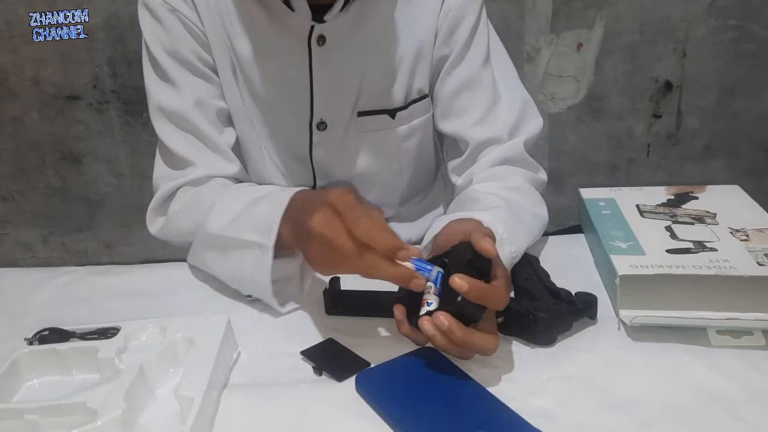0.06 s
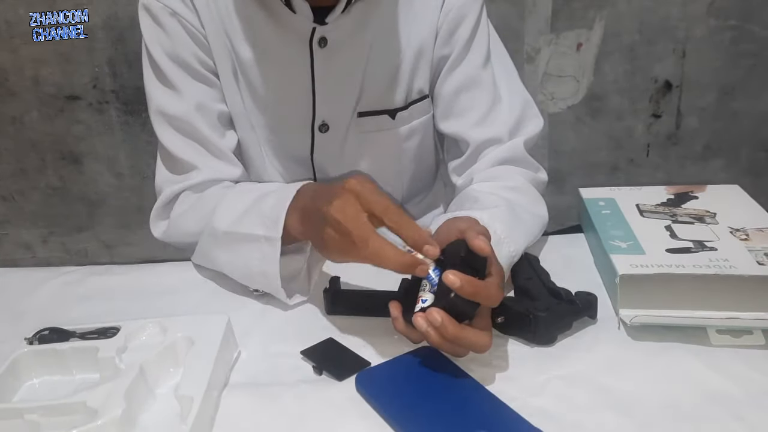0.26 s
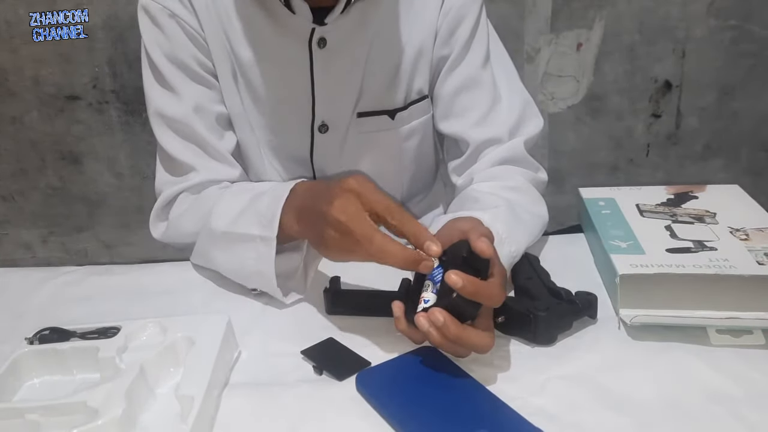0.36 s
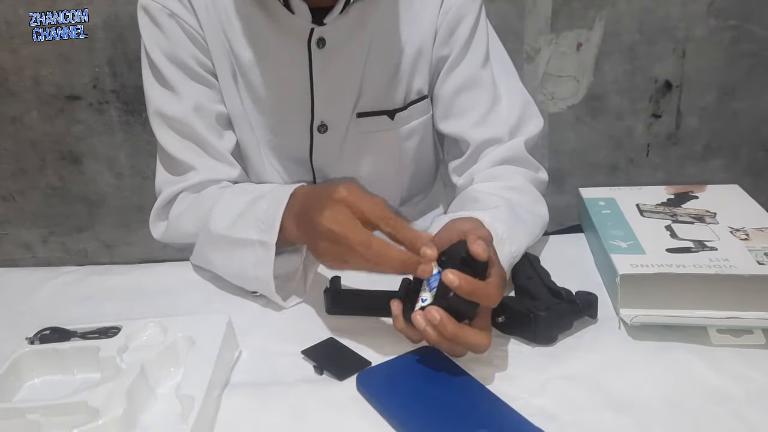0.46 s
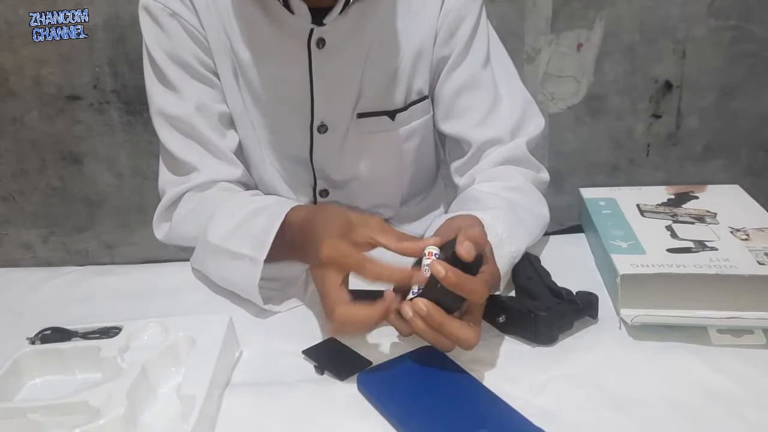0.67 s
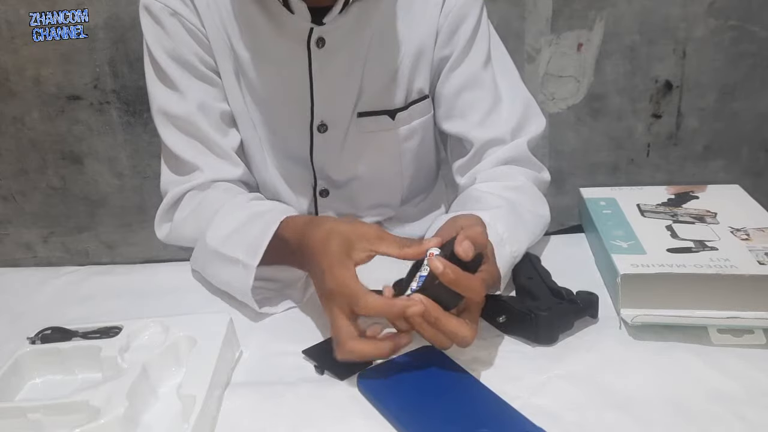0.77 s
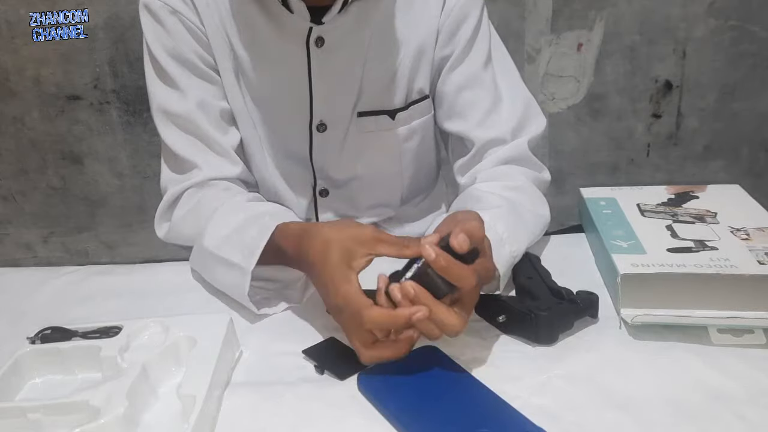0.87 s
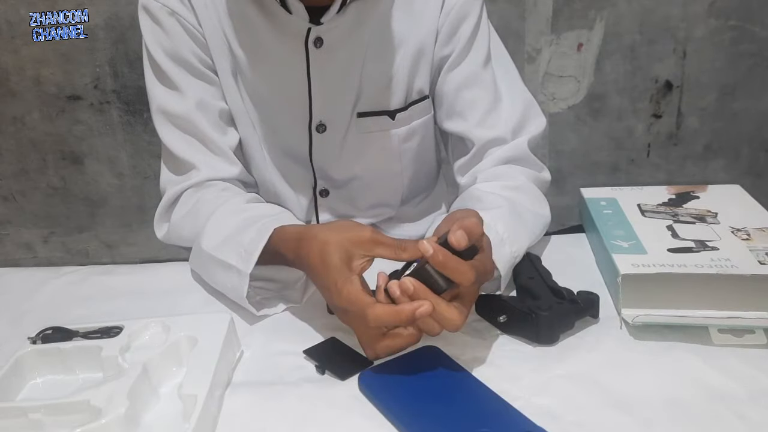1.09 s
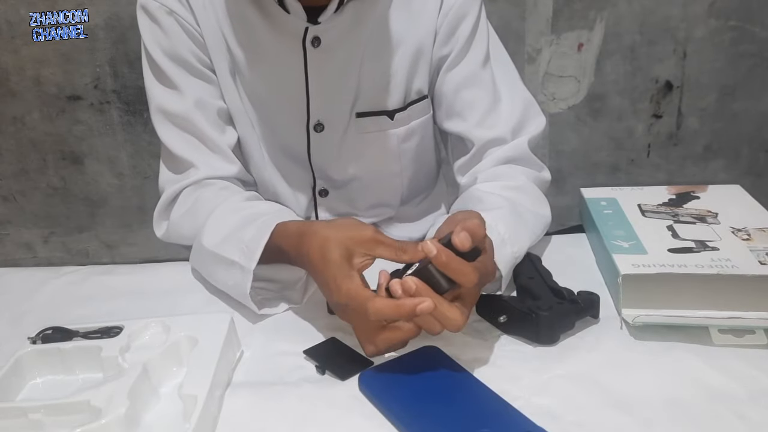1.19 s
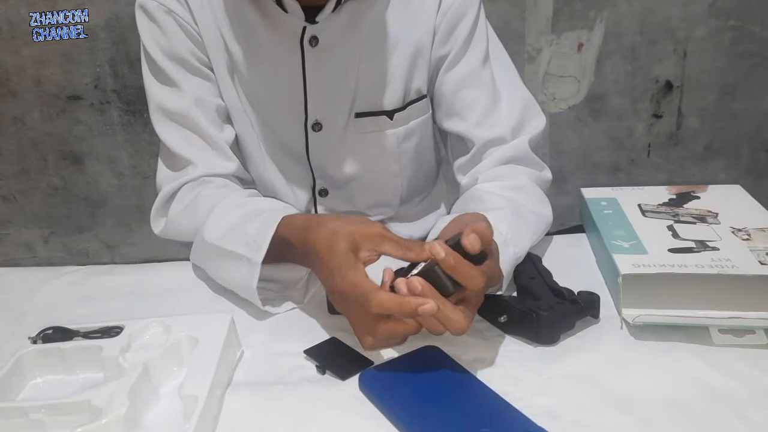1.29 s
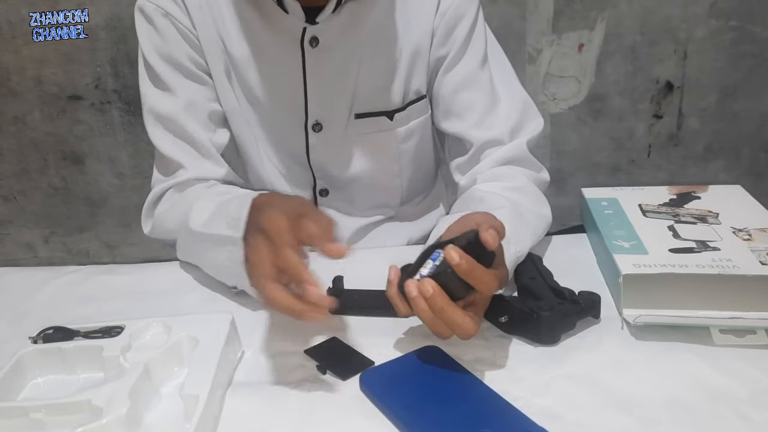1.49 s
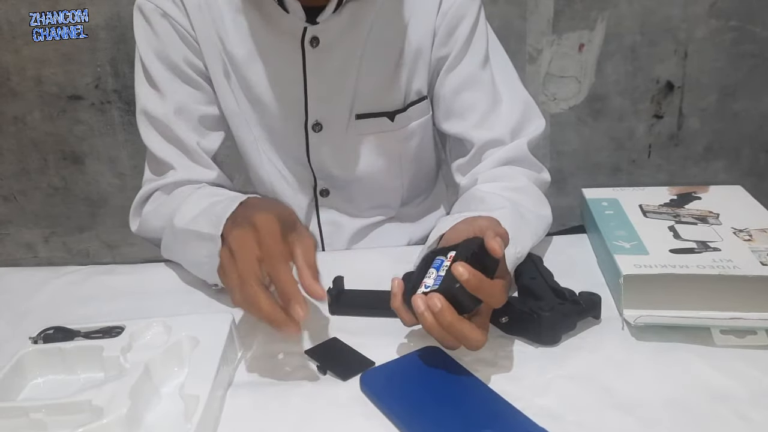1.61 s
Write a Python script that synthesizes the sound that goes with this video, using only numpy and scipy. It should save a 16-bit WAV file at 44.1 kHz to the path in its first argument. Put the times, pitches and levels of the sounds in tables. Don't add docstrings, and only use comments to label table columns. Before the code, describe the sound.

Batteries knock, rattle and snap into a small hollow plastic lamp while crickets chirp faintly outside

```python
import sys
import numpy as np
from scipy import signal
from scipy.fft import rfft, irfft, next_fast_len
from scipy.io import wavfile

SR = 44100
rng = np.random.default_rng(int(sys.argv[2]) if len(sys.argv) > 2 else 0)


def rack_gain(trim_db):
    fader = np.asarray(trim_db, float)
    return 10 ** (fader / 20)


def unload_wav(signal):
    wavfile.write(
        sys.argv[1],
        SR,
        np.round(np.clip(np.atleast_2d(signal).T, -1, 1) * 32767).astype(np.int16),
    )


N = 72765


def read(points, hz):
    table_hz, value = np.transpose(points)
    return np.interp(np.log(hz + 1), np.log(table_hz + 1), value)


def evened(x):
    return x / np.sqrt(np.mean(x ** 2) + 1e-20)


def add(mix, start_s, sound):
    at = round(start_s * SR)
    part = mix[max(at, 0):][:len(sound) + min(at, 0)]
    part += sound[max(-at, 0):][:len(part)]


def coloured(x, spectrum):
    gain = rack_gain(read(spectrum, np.fft.rfftfreq(len(x), 1 / SR)))
    return irfft(rfft(x) * gain, len(x))


def resonate(x, hz, width_hz):
    turn = np.exp(2j * np.pi * hz * np.arange(len(x)) / SR)
    r = np.exp(-np.pi * width_hz / SR)
    at_zero_hz = signal.lfilter([(1 - r) ** 2], [1, -2 * r, r * r], x / turn)
    return 2 * (turn * at_zero_hz).real


def ring(modes, t, phases):
    out = 0
    for (hz, level_db, t60_s), phase in zip(modes, phases):
        out = out + rack_gain(level_db - 60 * t / t60_s) * np.sin(2 * np.pi * (hz * t + phase))
    return out


def slow(top_hz):
    t = np.arange(N) / SR
    rates_hz = np.geomspace(.5, top_hz, num=12)
    return evened(sum(np.sin(2 * np.pi * (f * t + rng.random())) / np.sqrt(f) for f in rates_hz))


# hz, t60_s
ROOM_T60 = [(300, 0.35), (1000, .38), (3000, 0.31), (6000, 0.28), (9000, 0.27), (14000, 0.22)]
# hz, level_db
ROOM_TONE = [(300, 0.5), (700, -1.5), (1100, -8.5), (1700, 3.5), (3000, 8.5), (6000, 0), (10000, -5),
             (15000, 2.5)]


def room(x, t60_scale=0.93):
    rise_s = .012
    taps = np.zeros(SR)
    at = np.arange(80, SR - 20, 16)
    taps[at + rng.integers(0, 16, at.shape)] = rng.choice([-1., 1.], at.shape)
    hz, t, bands = signal.stft(taps, SR, nperseg=256)
    bands = bands * rack_gain(-60 * t / (t60_scale * read(ROOM_T60, hz)[:, None]))
    tail = signal.istft(bands, SR, nperseg=256)[1][:SR]
    tail = tail * (1 - np.exp(-np.arange(SR) / SR / rise_s))
    size = next_fast_len(len(x) + SR)
    tone = rack_gain(read(ROOM_TONE, np.fft.rfftfreq(size, 1 / SR)))
    return irfft(rfft(x, size) * rfft(tail / np.linalg.norm(tail), size) * tone, size)[:len(x)]


# hz, level_db, t60_s
CAVITY_MODES = [(678.2, -12.5, 0.061), (565, -51, .05), (800, -19, 0.12), (924, -44, 0.017),
                (1122, -6.5, .04)]
# hz, level_db
CRACK_SPECTRUM = [(1500, -14.5), (2500, -5), (4500, -3), (7000, 4), (9800, -8), (12000, -4), (15000, -13.5),
                  (17000, -14)]
CAVITY_DB = {"knock": -1.5, "snap": -5.5, "slide": 2.5, "rattle": 1.5, "tick": -1}


def hit(boom_db, boom_hz, click_db, crack_db, modes, cavity_db):
    boom_split_hz, boom_t60_s, boom_rise_s, low_cut_hz = 32.7, 0.056, 0.0017, 650
    click_rise_s, crack_t60_s, crack_wet_db, room_db = 0.00039, 0.013, 5.5, -2.5
    blunt_t60_s = 0.039 * 0.49
    t = np.arange(SR // 8) / SR
    phase_luck, pitch_luck = rng.random((2, 16))

    pair = np.cos(2 * np.pi * boom_split_hz * t) * np.sin(2 * np.pi * boom_hz * t)
    pair = pair * rack_gain(-60 * t / boom_t60_s)
    cavity = rack_gain(cavity_db) * ring(CAVITY_MODES, t, np.zeros(16))
    boom = (pair + cavity) * (1 - np.exp(-t / boom_rise_s))
    low_cut = signal.butter(N=2, Wn=low_cut_hz, btype="high", fs=SR, output="sos")
    boom = rack_gain(boom_db) * signal.sosfilt(low_cut, boom)

    struck = [(hz * (.98 + 0.031 * u), db, t60_s) for (hz, db, t60_s), u in zip(modes, pitch_luck)]
    click = rack_gain(click_db) / 2 * ring(struck, t, phase_luck / 4) * (1 - np.exp(-t / click_rise_s))
    blunt = click * rack_gain(-60 * t / blunt_t60_s) * 1.227
    crack_noise = coloured(rng.standard_normal(len(t)), CRACK_SPECTRUM)
    crack = rack_gain(crack_db - 60 * t / crack_t60_s) * crack_noise

    direct = np.pad(boom + click + crack, (0, SR // 2))
    sent = np.pad(boom + blunt + rack_gain(crack_wet_db) * crack, (0, SR // 2))
    return direct + rack_gain(room_db) * room(sent)


def blows(events, modes, cavity_db):
    out = np.zeros(N)
    for start_s, *blow in events:
        add(out, start_s, hit(*blow, modes, cavity_db))
    return out


# start_s, boom_db, boom_hz, click_db, crack_db
SLIDES = [
    (-.08, -24, 1055, -25.5, -68),
    (.371, -22.5, 1017, -14.5, -26),
    (.381, -14, 927, -27, -42),
    (.3992, -13.5, 759, -15, -32),
]
# hz, level_db, t60_s
SLIDE_MODES = [(346, -27.5, 0.081), (1485, -16, 0.0093), (2292, -1, 0.018), (2770, -1.5, 0.012),
               (3320, -2, .012), (4324, 1, .012), (4920, 1.5, 0.011), (5760, -6.5, 0.013), (8000, -8, .008)]


def slides():
    return blows(SLIDES, SLIDE_MODES, CAVITY_DB["slide"])


# hz, width_hz, level_db, pulses_per_s
TRILLS = [(5604, 170, -62, 51), (2480, 240, -70.5, 16), (8610, 240, -71, 60)]


def chorus():
    swell_db, throb_depth = 1.2, 0.25
    out = np.zeros(N)
    for hz, width_hz, level_db, pulses_per_s in TRILLS:
        turns = np.cumsum(pulses_per_s * (1 + 0.161 * slow(47))) / SR
        throb = 1 + throb_depth * np.cos(2 * np.pi * turns)
        rasp = evened(resonate(throb * rng.standard_normal(N), hz, width_hz))
        out += rack_gain(level_db + swell_db * slow(5.4)) * rasp
    return out


# hz, width_hz, level_db
MURMUR = (1100, 100, -76.5)


def murmur():
    hz, width_hz, level_db = MURMUR
    return rack_gain(level_db) * evened(resonate(rng.standard_normal(N), hz, width_hz))


# hz, density_db_per_hz
FAR_CHORUS = [(5100, -120), (5500, -85.5), (6400, -91), (7200, -100.5), (8000, -90.5), (8900, -89),
              (9250, -108), (10500, -125)]
# hz, density_db_per_hz
HISS_LEFT = [(25, -100), (60, -83.5), (170, -90), (700, -102), (2500, -112), (7000, -120), (10000, -123),
             (14000, -115)]
# hz, density_db_per_hz
HISS_RIGHT = [(25, -100), (60, -82.5), (170, -92), (700, -99), (1700, -110), (4000, -113), (10000, -118),
              (14000, -115)]


def hiss(spectrum):
    drift = rack_gain(.8 * slow(8))
    return coloured(rng.standard_normal(N), spectrum) * np.sqrt(SR / 2) * drift


# start_s, left_db, pitch_hz, right_minus_left_db
BUMPS = [
    (0.022, -66, 322, 17),
    (0.446, -55, 177, -12),
    (1.596, -53, 310, -14),
]


def bumps():
    out, t = np.zeros((2, N)), np.arange(3000) / SR
    for start_s, left_db, hz, right_db in BUMPS:
        swell = t / 0.0076 * np.exp(1 - t / 0.0056)
        thud = rack_gain(left_db) * np.sin(2 * np.pi * hz * t) * swell
        add(out[0], start_s - .006, thud)
        add(out[1], start_s - .006, rack_gain(right_db) * thud)
    return out


# start_s, level_db
CHIRPS = [
    (0.106, -54),
    (.39, -55.5),
    (.67, -58),
    (.94, -54),
    (1.226, -61),
    (1.508, -59),
]


def chirper():
    hz, width_hz, length_s, pulses_per_s = 4480, 400, .12, 35
    depth, rasp_gain, wet_db = .5, 1.7, -3
    t, gate = np.arange(0, length_s, 1 / SR), np.zeros(N)
    strokes = 1 - depth * np.cos(np.pi * pulses_per_s * t) ** 2
    for start_s, level_db in CHIRPS:
        add(gate, start_s, rack_gain(level_db) * strokes * np.sqrt(np.sin(np.pi * t / length_s)))
    rasp = evened(resonate(rng.standard_normal(N), hz, width_hz))
    tone = np.sin(2 * np.pi * hz * np.arange(N) / SR)
    song = gate * (tone + rasp_gain * rasp) / 2
    return song + rack_gain(wet_db) * room(song, t60_scale=.9)


# start_s, boom_db, boom_hz, click_db, crack_db
KNOCKS = [
    (.2222, 0, 1090, -15, -37.5),
    (.2315, -2, 987, -28, -32.5),
    (.743, -12.5, 1082, -37, -48),
    (.895, -40, 1106, -54, -75),
    (1.507, -36.5, 1088, -65, -69.5),
]
# hz, level_db, t60_s
KNOCK_MODES = [(2165, -1.5, 0.023), (2720, 5, 0.03), (4160, 1, 0.011), (4680, 1, 0.018),
               (5860, 4.5, 0.0033), (6250, 2, .012), (6870, 2, 0.014), (8000, -10.5, 0.017)]


def knocks():
    return blows(KNOCKS, KNOCK_MODES, CAVITY_DB["knock"])


# start_s, boom_db, boom_hz, click_db, crack_db
TICKS = [
    (.268, -8, 712.5, -15.5, -23.5),
    (.284, -3.5, 991, -43, -48),
    (.291, -31.5, 900, -46.5, -46),
    (.511, -27, 788, -31, -43.5),
    (.792, -33, 892, -35, -36),
    (0.886, -58, 870, -59, -60),
]
# hz, level_db, t60_s
SPRING_MODES = [(2840, 10, 0.0041), (4130, -6.5, 0.014), (5900, 0.5, 0.015), (7400, 0, 0.0042),
                (11100, -3.5, 0.011), (12100, -1, .01), (12700, -8.5, .008)]


def ticks():
    return blows(TICKS, SPRING_MODES, CAVITY_DB["tick"])


# start_s, boom_db, boom_hz, click_db, crack_db
RATTLES = [
    (.554, -37, 800, -29.5, -40.5),
    (.5635, -10.5, 800, -13, -27.5),
    (0.5796, -8, 868, -9, -22.5),
    (.584, -4.5, 1007, -11, -21.5),
    (.5985, -9.5, 889, -11.5, -38),
]
# hz, level_db, t60_s
CELL_MODES = [(342, -18, 0.058), (455, -22.5, 0.034), (2260, -7, 0.012), (2554, -6.5, 0.045),
              (3378, -0.5, .015), (3710, 2, 0.0065), (4320, 1.5, .012), (4910, -10, 0.02),
              (5900, -5, 0.0093), (7680, -6, 0.009)]


def rattles():
    return blows(RATTLES, CELL_MODES, CAVITY_DB["rattle"])


# start_s, boom_db, boom_hz, click_db, crack_db
SNAPS = [
    (0.9744, 3.5, 1054, -6, -11.5),
    (1.029, -6.5, 1087, -34, -27),
]
# hz, level_db, t60_s
SNAP_MODES = [(2144, 1, 0.018), (2750, -8.5, .015), (4040, -10, .012), (4760, -5, .012), (6755, -1, 0.027),
              (7170, -4, .012), (8300, -4, .01), (12000, -20, .008)]


def snaps():
    return blows(SNAPS, SNAP_MODES, CAVITY_DB["snap"])


# hz, level_db
MIC = [(200, -1), (500, 1.5), (1250, 0), (1600, 0.5), (2000, 0.5), (15500, 2.5), (16000, -21), (20000, -32)]


def lamp():
    return coloured(slides() + knocks() + ticks() + rattles() + snaps(), MIC)


def leak(near):
    narrow = rack_gain(-46) * resonate(near, hz=1120, width_hz=180)
    wide = rack_gain(-54) * resonate(near, hz=700, width_hz=760)
    return narrow + wide


def scene():
    near = lamp()
    crickets = chirper() + chorus() + hiss(FAR_CHORUS)
    right = near + crickets + murmur() + hiss(HISS_RIGHT)
    left = leak(near) + hiss(HISS_LEFT)
    return np.array([left, right]) + bumps()


def top_cut(x):
    return signal.sosfilt(signal.butter(12, 16670, fs=SR, output="sos"), x)


def record(dry):
    mix = np.clip(dry, -.99, .99)
    return top_cut(mix)


dry = scene()
out = record(dry)
unload_wav(out)
```